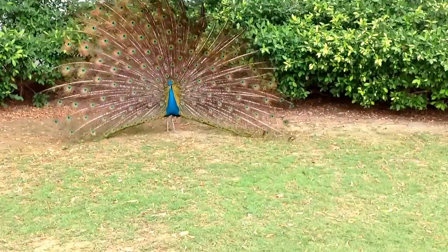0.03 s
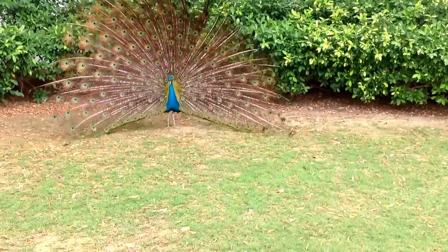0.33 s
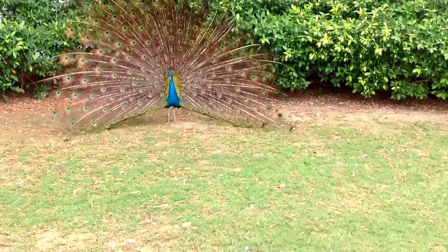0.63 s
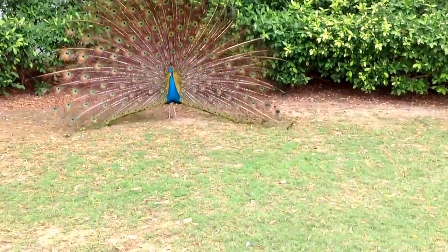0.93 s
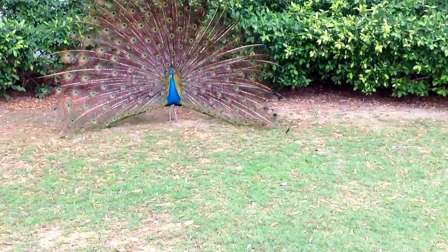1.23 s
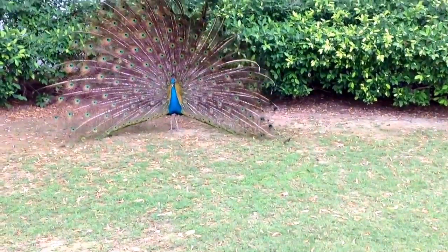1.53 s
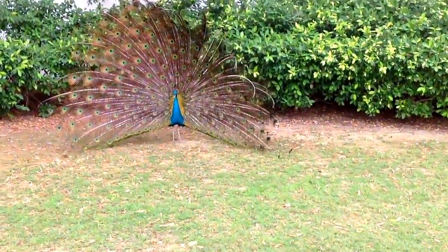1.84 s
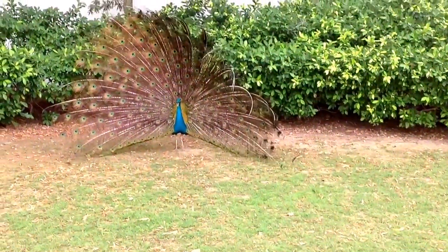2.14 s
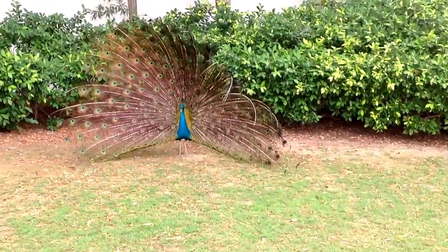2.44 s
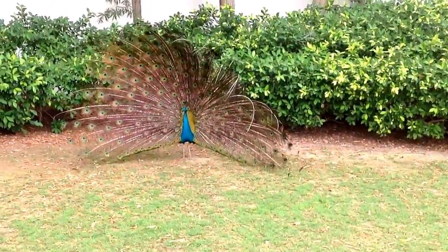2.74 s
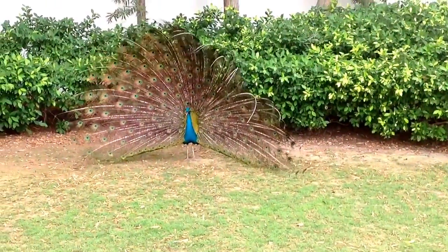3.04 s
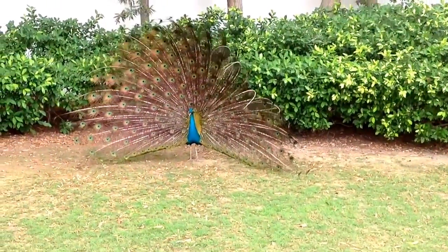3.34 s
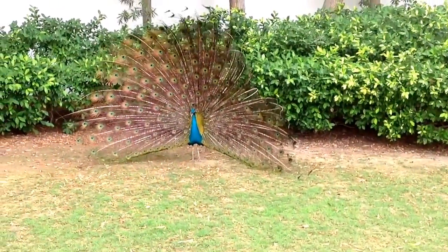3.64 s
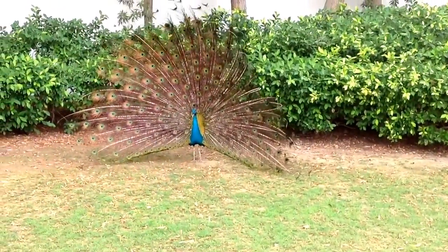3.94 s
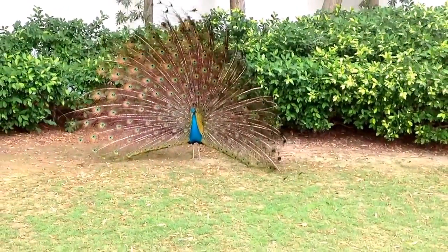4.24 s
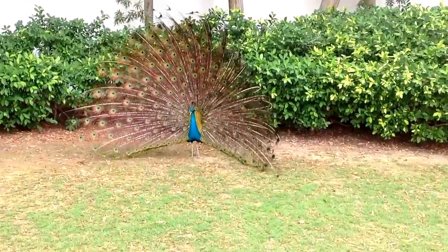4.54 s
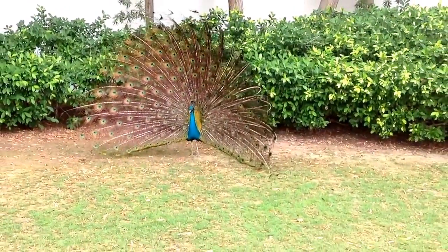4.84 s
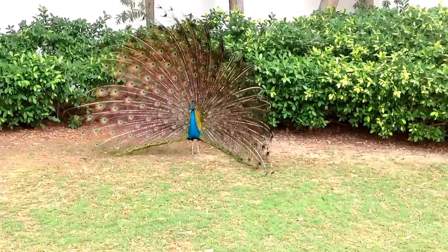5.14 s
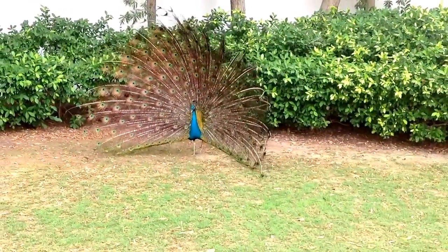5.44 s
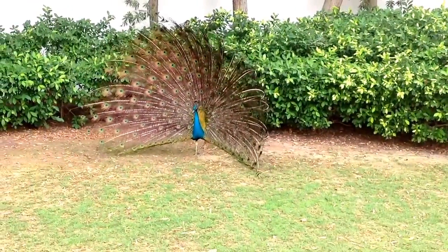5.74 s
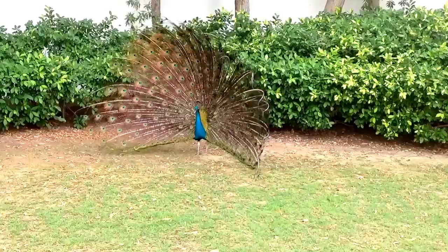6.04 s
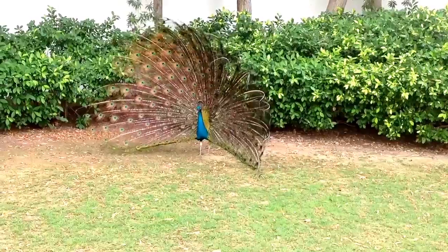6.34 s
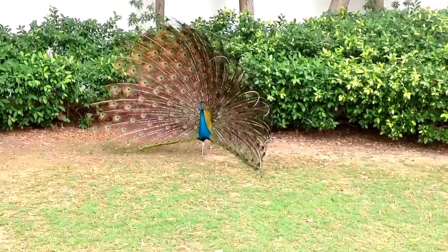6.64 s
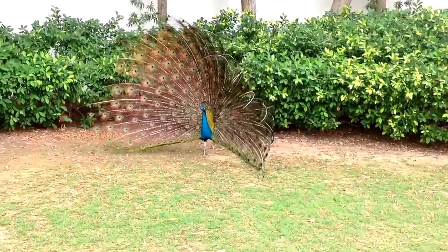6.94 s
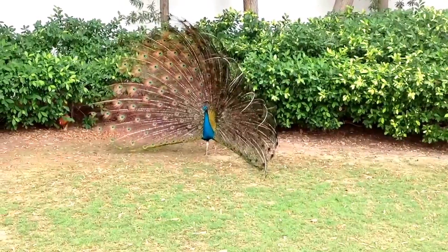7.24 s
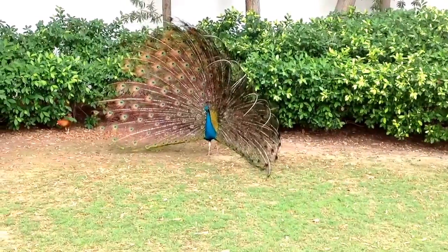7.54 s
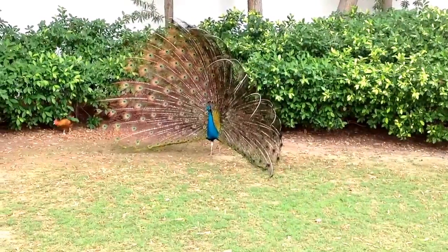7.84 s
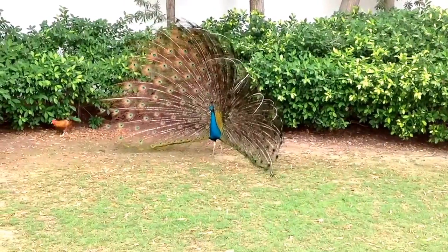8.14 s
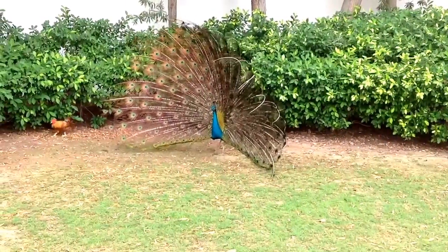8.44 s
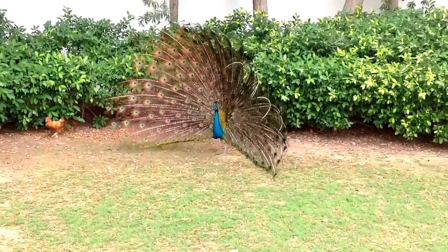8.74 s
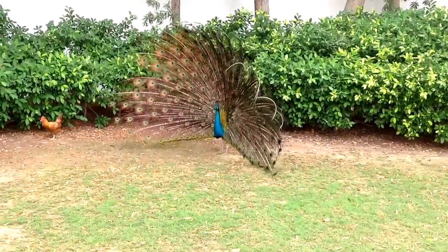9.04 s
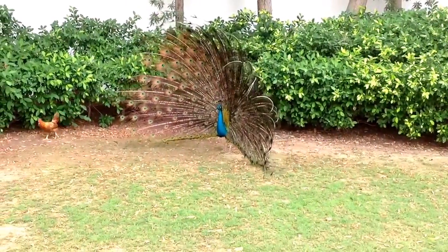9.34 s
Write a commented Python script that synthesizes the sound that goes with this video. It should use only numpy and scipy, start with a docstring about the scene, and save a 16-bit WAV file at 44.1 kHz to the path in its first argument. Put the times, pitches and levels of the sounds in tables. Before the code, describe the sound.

Distant traffic rumbles steadily in a quiet garden, with a brief close rub on the microphone and one loud, dull tap later.

```python
"""A quiet garden with a hedge, heard from a hand-held camera; distant traffic rumbles throughout.
About 1 s in, a finger slides and bumps over the case, right by the microphone, then shifts its grip.
From 2 s a far engine drones, sinking in pitch as it passes near 4 s; a light breeze stirs the hedge
around 3 s and again at 6.6 s. At 8.2 s the finger taps the case once, close and loud."""
import sys
import numpy as np
from scipy import signal
from scipy.fft import rfft, irfft, next_fast_len
from scipy.io import wavfile
from scipy.ndimage import uniform_filter1d, map_coordinates

SR = 44100
rng = np.random.default_rng(int(sys.argv[2]) if len(sys.argv) > 2 else 0)


def unload_audio(sound):
    """Save the sound as a 16-bit wav file, at the path given as the first command line argument."""
    columns = np.transpose(np.atleast_2d(sound))
    # keep every value between -1 and 1, then stretch to whole-number steps
    steps = np.round(np.clip(columns, -1, 1) * 32767)
    wavfile.write(sys.argv[1], SR, steps.astype(np.int16))


N = 422478

# spectrum of the case under a soft rubbing finger: f/Hz, relative level/dB
RUBBED_CASE = [(20, -46), (55, -39), (112, -13), (152, 5.5), (220, -4), (300, 0.5), (500, -4.5), (950, -9),
               (1500, -16.5), (3000, -27), (4500, -36), (8000, -41), (12500, -50), (15500, -58)]
# spectrum of dry skin crackling: f/Hz, relative level/dB
DRY_SKIN = [(800, -35), (2500, 8), (4000, 5), (7000, -3.5), (12000, -13), (15500, -18)]


def amp(db):
    """Decibels to gain."""
    return 10 ** (np.asarray(db) / 20)


def unit(x):
    """Scale to rms 1."""
    return x / np.sqrt(np.mean(x ** 2) + 1e-20)


def gain_at(spectrum, hz):
    """Gain read from (f/Hz, level/dB) points on a log frequency axis."""
    f, db = np.transpose(spectrum)
    return amp(np.interp(np.log(hz + 1), np.log(f + 1), db))


def curves(rows):
    """One value per sample for each column after the time."""
    times, *columns = np.transpose(rows)
    return [np.interp(np.arange(N) / SR, times, column) for column in columns]


def wobble(rate):
    """A smooth random curve, rate knots a second."""
    return map_coordinates(rng.standard_normal(8192), [np.arange(N) * rate / SR], mode="mirror")


def swell(start_s, hold_s, attack_s, release_s):
    """Gain that rises to 1 at the start, holds and dies away; attack and release each span 20 dB."""
    t = np.arange(N) / SR - start_s
    return 10 ** -(np.maximum(-t, 0) / attack_s + np.maximum(t - hold_s, 0) / release_s)


def filtered(x, response):
    """Filter x by a gain given as a function of frequency."""
    size = next_fast_len(N + SR // 2)
    return irfft(rfft(x, size) * response(np.fft.rfftfreq(size, 1 / SR)), size)[:N]


def rush(spectrum, patchy_db):
    """Coloured noise of rms 1 with drifting patches of gain."""
    bins = signal.stft(rng.standard_normal(N), nperseg=1024)[2]
    patches = uniform_filter1d(rng.standard_normal(bins.shape), size=7, axis=0)
    patches = uniform_filter1d(patches, size=10, axis=1)
    noise = signal.istft(bins * amp(patchy_db * unit(patches)), nperseg=1024)[1][:N]
    return unit(filtered(noise, lambda hz: gain_at(spectrum, hz)))


def damped_ring(spectrum, size=4096):
    """The heavily damped answer of a surface to one push, peak 1."""
    cepstrum = irfft(np.log(gain_at(spectrum, np.fft.rfftfreq(size, 1 / SR))))
    cepstrum[1:size // 2] *= 2  # minimum phase: nothing sounds before the push
    cepstrum[size // 2 + 1:] = 0
    ring = irfft(np.exp(rfft(cepstrum)))
    return ring / np.abs(ring).max()


def friction(spectrum, spread_db, rate):
    """Surfaces catch and slip in countless tiny pushes of uneven size; rms 1."""
    slips = rng.standard_normal(N) * amp(spread_db * wobble(rate))
    return unit(signal.fftconvolve(slips, damped_ring(spectrum))[:N])


def far_tone(hz, waver_hz, flutter_db):
    """A distant tone of about rms 1; the air makes it waver."""
    phase = 2 * np.pi * np.cumsum(hz + waver_hz * wobble(14)) / SR
    return amp(flutter_db * wobble(16)) * np.sqrt(2) * np.sin(phase)


def traffic():
    """Rumble and tyre noise from a distant road swell slowly over a faint steady hiss."""
    # flow of traffic: t/s, tyre level/dB, rumble level/dB (both trimmed below)
    flow = [(0.15, -44, -49), (0.8, -43.4, -44.5), (2.1, -42.5, -47), (3.0, -41, -44.5), (4.0, -43, -44.5),
            (5.6, -43.4, -45.5), (7.4, -44.5, -48.5), (8.0, -44.7, -48.0), (9.2, -47.5, -49.5)]
    # spectra of the three layers: f/Hz, relative level/dB
    rumble_spectrum = [(20, -49), (45, -35), (70, -11.5), (104, -9), (140, 0), (185, 1), (225, -0.5),
                       (275, -4.5), (330, -8.5), (500, -22.5), (1000, -55)]
    tyre_spectrum = [(120, -22), (330, -0.5), (560, 0.5), (780, 1.5), (1150, -1), (1700, 0), (1970, 5),
                     (2200, -5), (2600, -11.5), (3200, -13.5), (3850, -9), (4500, -24.5), (8000, -30.5),
                     (15000, -50)]
    hiss_spectrum = [(1000, 7.5), (5000, -4), (9000, 0), (14000, -1), (15300, -10)]
    tyre_db, rumble_db = curves(flow)
    rumble = amp(rumble_db + 1.1 + 0.15 * wobble(8)) * rush(rumble_spectrum, patchy_db=1.45)
    tyres = amp(tyre_db + 0.58 + 0.36 * wobble(6.5)) * rush(tyre_spectrum, patchy_db=0.71)
    hiss = amp(-65.5) * rush(hiss_spectrum, patchy_db=0.2)
    return rumble + tyres + hiss


def machinery():
    """Far machinery hums faintly all the while."""
    # tones of the hum: f/Hz, level/dB
    tones = [(71, -69), (93, -60.5)]
    return sum(amp(db) * far_tone(hz, waver_hz=1.6, flutter_db=2.0) for hz, db in tones)


def engine():
    """Only a few low tones of a passing engine carry to the garden; they sink as it goes by."""
    # the engine pulling: t/s, hold/s, level/dB
    pulls = [(2.05, 3.6, -49), (2.8, 0.29, -42)]
    # its tones: multiple of the pitch, relative level/dB
    orders = [(1, -1), (1.55, -18), (2.5, -17)]
    centre_hz, sink_hz, pass_s, sink_s = 149.2, 10.5, 4.2, 0.6
    pitch_hz = centre_hz - sink_hz * np.tanh((np.arange(N) / SR - pass_s) / sink_s)
    effort = sum(amp(db) * swell(s, hold, attack_s=0.2, release_s=0.46) for s, hold, db in pulls)
    return effort * sum(amp(db) * far_tone(k * pitch_hz, waver_hz=1, flutter_db=0) for k, db in orders)


def hedge():
    """Leaves brush one another as each light gust comes and goes."""
    # gusts: peak t/s, level/dB, time to rise or fall by 20 dB/s
    gusts = [(3.0, -57, 5.2), (6.6, -63, 1.7)]
    # spectrum of the rustle: f/Hz, relative level/dB
    leaf_spectrum = [(1200, -21), (3000, 12.5), (5000, 3), (7500, -9), (11000, -20.5), (15500, -17)]
    breeze = sum(amp(db) * swell(s, 0, fade, fade) for s, db, fade in gusts)
    flutter = amp(2.0 * wobble(12))
    return breeze * flutter * friction(leaf_spectrum, spread_db=1.5, rate=400)


def finger_slide():
    """A finger rubs the case beside the microphone; the skin crackles once it is moving."""
    # strokes: t/s, hold/s, rubbing level/dB, crackle level/dB
    strokes = [(0.953, .004, -22, -60), (0.983, 0.047, -15.5, -37.5), (1.069, 0.0091, -17, -36),
               (1.17, 0.13, -44.5, -59)]
    crackle_lag_s = 0.013
    rubbing, dragging = np.zeros(N), np.zeros(N)
    for s, hold, rub_db, crackle_db in strokes:
        rubbing += amp(rub_db) * swell(s, hold, attack_s=0.021, release_s=0.073)
        dragging += amp(crackle_db) * swell(s + crackle_lag_s, hold, attack_s=0.05, release_s=0.082)
    slide = rubbing * friction(RUBBED_CASE, spread_db=0, rate=600)
    crackle = dragging * friction(DRY_SKIN, spread_db=3.5, rate=800)
    return slide + crackle


def grip_shifts():
    """Each press or shift of grip sends a brief scuff through the case."""
    # presses: t/s, level/dB, half length/s
    presses = [(0.809, -33, 0.0028), (0.822, -37.5, .005), (0.979, -14.5, .004), (1.074, -11.5, 0.004),
               (1.887, -36.5, 0.018), (3.298, -35, 0.014)]
    t = np.arange(N) / SR
    pressure = sum(amp(db) * np.exp(-0.5 * ((t - s) / half) ** 2) for s, db, half in presses)
    return pressure * friction(RUBBED_CASE, spread_db=2.5, rate=550)


def finger_taps():
    """Each touch pushes the case into a dull knock while the skin adds a sharp tick."""
    # touches: t/s, push level/dB, tick level/dB
    touches = [(.806, -23.5, -60), (1.1, -9, -33), (1.1096, -14, -34), (1.1346, -24, -40),
               (1.1514, -21, -43), (1.234, -31, -29), (1.332, -25, -41), (1.87, -41, -37),
               (2.366, -29, -37), (2.9343, -38, -37), (3.2777, -36, -35), (8.2161, 0.5, -45)]
    # the tapped case as the microphone hears it: f/Hz, relative level/dB
    case_spectrum = [(20, -73), (60, -40), (110, -7.5), (180, 1), (260, 0.5), (450, -3), (900, -8.5),
                     (1900, -14), (3200, -21), (5400, -30.5), (7900, -57), (10000, -39), (13300, -37),
                     (15500, -41)]
    pushes, contacts = np.zeros(N), np.zeros(N)
    for s, push_db, tick_db in touches:
        pushes[round(s * SR)] = amp(push_db)
        contacts[round(s * SR)] = amp(tick_db)
    knocks = signal.fftconvolve(pushes, damped_ring(case_spectrum))
    ticks = signal.fftconvolve(contacts, damped_ring(DRY_SKIN))
    return (knocks + ticks)[:N]


def scene():
    """The distance, the hedge and close handling, all on one microphone."""
    garden = traffic() + machinery() + engine() + hedge()
    handling = finger_slide() + grip_shifts() + finger_taps()
    return (garden + handling)[None]


def record(dry):
    """The microphone opens a moment late and cuts the highest treble; the loudest peak is softly rounded off."""
    open_s, fade_s, ceiling, top_hz = 0.134, 0.003, 0.92, 15250
    live = np.clip((np.arange(N) / SR - open_s) / fade_s, 0, 1)
    rounded = dry[0] / (1 + np.abs(dry[0] / ceiling) ** 8) ** (1 / 8)
    return filtered(rounded * live, lambda hz: 1 / (1 + (hz / top_hz) ** 200))[None]


dry = scene()
out = record(dry)
unload_audio(out)
```